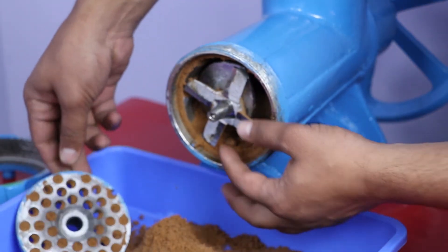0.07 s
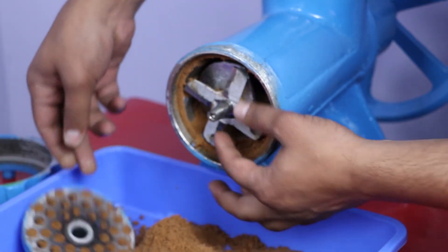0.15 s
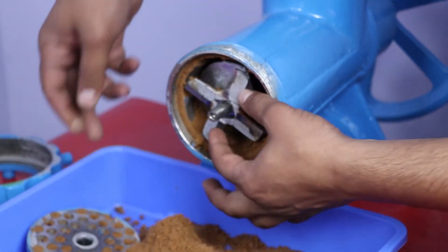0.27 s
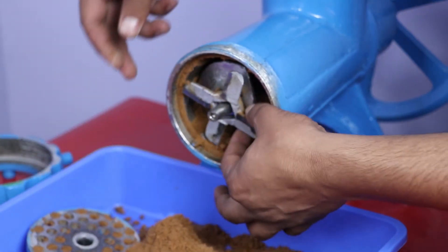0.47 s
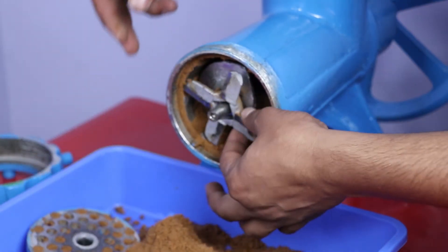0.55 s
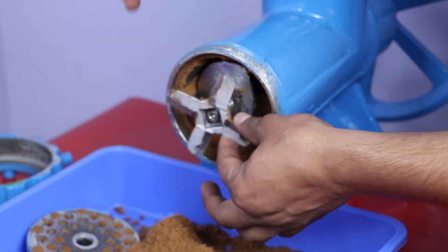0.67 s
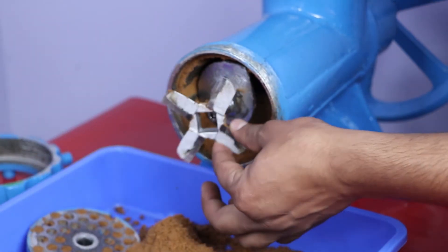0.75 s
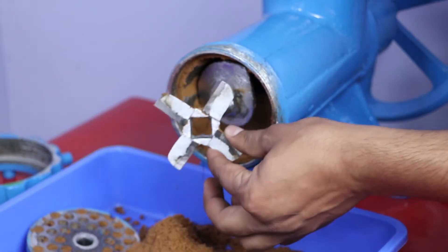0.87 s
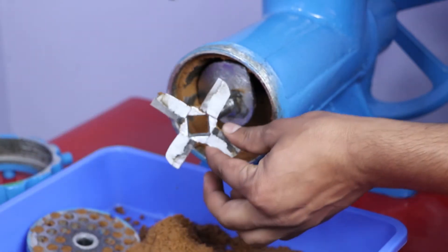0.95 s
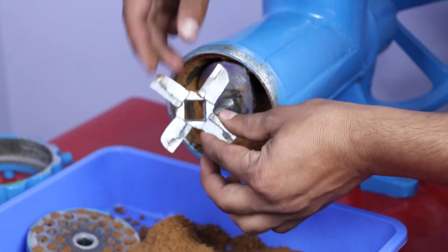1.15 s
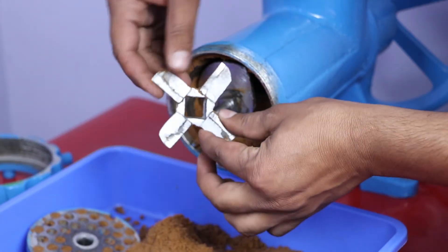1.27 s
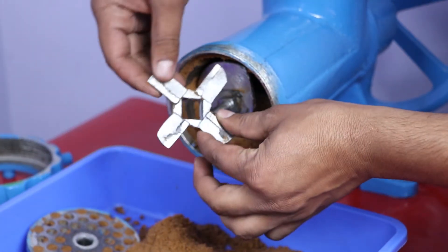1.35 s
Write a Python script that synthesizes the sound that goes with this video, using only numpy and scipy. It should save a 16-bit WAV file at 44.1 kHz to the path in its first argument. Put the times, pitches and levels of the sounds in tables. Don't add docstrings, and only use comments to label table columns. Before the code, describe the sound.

A steel grinder plate scrapes grittily along a plastic tray in two quick strokes with faint metal ticks, then drops flat with a hollow thud; the bare room rings in the bass, close microphone, soft hiss.

```python
import sys
import numpy as np
from scipy import signal
from scipy.fft import rfft, irfft, next_fast_len
from scipy.io import wavfile
from scipy.ndimage import map_coordinates

SR = 44100
rng = np.random.default_rng(int(sys.argv[2]) if len(sys.argv) > 2 else 0)


def linear_from_db(decibels):
    return 10 ** (np.asarray(decibels, float) / 20)


def wav_out(sig):
    wavfile.write(sys.argv[1], SR, np.round(np.clip(np.atleast_2d(sig).T, -1, 1) * 32767).astype(np.int16))


N = 61739

THUD_S = 0.2602
ROOM_DELAY_S = 0.005


def unit(x):
    return x / np.sqrt(np.mean(x ** 2) + 1e-20)


def along(points, hz):
    f, v = np.transpose(points)
    return np.interp(np.log(hz + 1), np.log(f + 1), v)


def wobble(rate):
    knots = rng.standard_normal(int(N * rate / SR) + 4)
    return map_coordinates(knots, [np.arange(N) * rate / SR])


def filtered(x, response):
    m = next_fast_len(x.shape[-1] + 8192)
    spectrum = rfft(x, m) * response(np.fft.rfftfreq(m, 1 / SR))
    return irfft(spectrum, m)[..., :x.shape[-1]]


def spread(pair, alike):
    def mid_and_side(hz):
        turn = np.arccos(np.clip(along(alike, hz), -1, 1)) / 2
        return np.array([np.cos(turn), np.sin(turn)])

    mid, side = filtered(pair, mid_and_side)
    return np.array([mid + side, mid - side])


def ring(start_s, db, hz, t60, rise_s):
    t = np.maximum(np.arange(N) / SR - start_s, 0)
    swell = 1 - np.exp(-t / rise_s)
    return linear_from_db(db - 60 * t / t60) * np.sin(2 * np.pi * hz * t) * swell


def lean(db):
    return linear_from_db(np.array([[db / 2], [-db / 2]]))


def floor():
    # f/Hz, level/dB per Hz
    noise_color = [(15, -53), (25, -14), (49, 1.5), (80, -9.5), (420, -11), (3370, -25), (4800, -31),
                   (8500, -26), (15600, -34.5)]
    # f/Hz, likeness (1 = the same)
    noise_alike = [(60, 0.81), (240, 0.2), (950, 0.13), (3770, 0.04), (15000, 0.065)]
    noise = filtered(rng.standard_normal((2, N)), lambda hz: linear_from_db(along(noise_color, hz)))
    level_db = -55.5 + 2.5 + 0.82 * wobble(6.7)
    return linear_from_db(level_db) * unit(spread(noise, noise_alike)) * lean(-2)


def standing():
    # f/Hz, level/dB, t60/s
    wall_tones = [(102.7, -19.5, 1.87), (157.5, 1, .5), (206.6, -3, 0.62), (240.4, -9, 0.273),
                  (304.3, -5.5, 0.84), (375.4, -10, 0.92), (424, -15.5, 1.2), (450.5, -4, 0.48),
                  (570, -9, 0.29), (611, -18.5, 1)]
    thud_db, build_s = -22, 0.035
    knocks = [(-0.06, thud_db - 11.5), (THUD_S + ROOM_DELAY_S, thud_db)]  # t/s, level/dB
    total = np.zeros(N)
    for hz, db, t60 in wall_tones:
        for knock_s, knock_db in knocks:
            start_s = knock_s + 0.004 * rng.random()
            total += ring(start_s, knock_db + db, hz, t60, build_s)
    return total


def slide():
    # f/Hz, level/dB per Hz
    grit_color = [(80, -62), (180, -12), (350, -11.5), (560, -7.5), (900, -6.5), (1840, -6), (2600, -11),
                  (8000, -17), (15600, -26.5)]
    # f/Hz, width/Hz, level/dB
    tray_tones = [(592, 255, 0), (1163, 70, -4), (1440, 185, 0.5), (1829, 17, 7.5), (2228, 150, -3.5),
                  (3340, 160, -3.5), (3800, 100, -6)]
    # f/Hz, likeness (1 = the same)
    near_alike = [(60, .9), (300, 1), (1000, 0.8), (3000, 0.23), (12000, 0.23)]
    # t/s, level/dB
    strokes = [
        [(0.0, -33.5), (0.018, -37), (0.052, -35), (0.082, -44.5), (0.134, -45.5)],
        [(0.136, -48.5), (0.148, -35), (0.212, -31), (0.228, -23), (0.258, -22.5), (0.262, -26.5)],
    ]
    grains_per_s, grain_spread_db, stutter_db, tray_db = 12000, 1.5, 0.9, 1
    end_s, lift_t60 = 0.26, 0.056
    settle_db, settle_t60 = -28, 1.2

    hits = rng.random((2, N)) < grains_per_s / SR
    strengths = rng.standard_normal((2, N)) * linear_from_db(grain_spread_db * rng.standard_normal((2, N)))
    grains = hits * strengths

    def grit_on_tray(f):
        tray = sum(linear_from_db(db) * 1j * f * w / (c * c - f * f + 1j * f * w) for c, w, db in tray_tones)
        return linear_from_db(along(grit_color, f)) * (1 + linear_from_db(tray_db) * tray)

    grit = unit(spread(filtered(grains, grit_on_tray), near_alike))
    t = np.arange(N) / SR
    s, effort_db = np.concatenate(strokes).T
    after = np.maximum(t - end_s, 0)
    lifted_db = np.maximum(-60 * after / lift_t60, settle_db - 60 * after / settle_t60)
    return grit * linear_from_db(np.interp(t, s, effort_db) + 2.5 + stutter_db * wobble(150) + lifted_db)


def ticks():
    contact_s = [.001, .038, .143, .166, .178, .229, .249, .3187, .357, .55, .613, .645, 1.279]
    # f/Hz, level/dB, t60/s
    contact_tones = [
        [(890, -30, .03), (1480, -31, .03)],
        [(900, -31, .08), (1500, -28, .08), (1740, -30, .07), (3430, -32, .08), (5540, -41, .05)],
        [(520, -28, .12)],
        [(1500, -30, .02), (3800, -40, .015)],
        [(1900, -31, .02), (8000, -40, .03)],
        [(614, -19, .04), (3350, -30, .03), (7790, -32, .02)],
        [(1450, -18, .05), (3970, -26, .04), (6400, -33, .03)],
        [(9000, -36, .005), (10500, -34, .005), (12000, -34, .005)],
        [(950, -34, .2), (1410, -38, .05), (2280, -41, .25), (2410, -34, .08)],
        [(1580, -54, .1)],
        [(603, -52, .15), (980, -44, .13), (1270, -56, .08)],
        [(760, -49, .12)],
        [(9000, -61, .12)],
    ]
    rise_share = 0.04
    total = np.zeros(N)
    for start_s, tones in zip(contact_s, contact_tones):
        for hz, db, t60 in tones:
            total += ring(start_s, db, hz, t60, rise_share * t60)
    return total


def room(x):
    # f/Hz, t60/s
    echo_t60 = [(100, 1), (300, 0.36), (500, 0.65), (900, 0.64), (2000, 0.42), (5000, .35), (12000, 0.4)]
    # f/Hz, level/dB
    echo_color = [(60, 6), (125, -4), (165, 5), (300, 3), (450, -1), (1000, -2.5), (4000, -10),
                  (12000, -5.5)]
    # f/Hz, likeness (1 = the same)
    echo_alike = [(60, 1), (250, 0.99), (1000, 0.35), (3500, 0.17), (12000, 0.58)]
    build_s = 0.023
    hz, t, z = signal.stft(rng.standard_normal((2, SR)), SR, nperseg=512)
    fade = linear_from_db(-60 * t / along(echo_t60, hz)[:, None])
    z = z * fade * (1 - np.exp(-t / build_s))
    z = z / np.linalg.norm(z, axis=2, keepdims=True)
    tail = signal.istft(z, SR, nperseg=512)[1]
    tail = spread(tail / np.linalg.norm(tail[0]), echo_alike)
    tail = filtered(tail, lambda f: linear_from_db(along(echo_color, f)))
    delayed = np.pad(x, (round(ROOM_DELAY_S * SR), 0))
    return signal.fftconvolve(delayed[None], tail, axes=1)[:, :N]


def thud():
    # f/Hz, level/dB, t60/s
    hollow_tones = [(440, 0, .063), (250, -5, .028), (555, -16, .2), (170, -22, .06), (1450, -21, .04),
                    (735, -24, .1)]
    thud_db, rise_s = -2.5, 0.0004
    contact_s, damped_t60 = 0.0125, 0.007
    boom = np.zeros(N)
    for k, (hz, db, t60) in enumerate(hollow_tones):
        boom += (-1) ** k * ring(THUD_S, thud_db + db, hz, t60, rise_s)
    late = np.maximum(np.arange(N) / SR - THUD_S - contact_s, 0)
    return boom * linear_from_db(-60 * late / damped_t60)


def scene():
    left_db, low_cut_hz = -1.5, 130
    left_lag_s = 0.000042
    thud_send_db, tick_send_db = -4.5, -0.5

    grit, boom, taps = slide(), thud(), ticks()
    sent = grit.mean(0) + linear_from_db(thud_send_db) * boom + linear_from_db(tick_send_db) * taps
    wet = standing() + room(sent)

    def openings(hz):
        lag = np.exp(-1j * np.pi * hz * left_lag_s * np.array([[1], [-1]]))
        low_cut = (hz / (hz - 1j * low_cut_hz / 2)) ** 2
        return lag * low_cut

    heard = filtered((grit + boom + wet) * lean(left_db), openings)
    return heard + taps * lean(left_db) + floor()


def top_cut(x):
    return signal.sosfilt(signal.butter(12, 15740, fs=SR, output="sos"), x)


def record(dry):
    top_hz = 15740
    mix = filtered(dry, lambda hz: hz < top_hz)
    return top_cut(mix)


dry = scene()
out = record(dry)
wav_out(out)
```